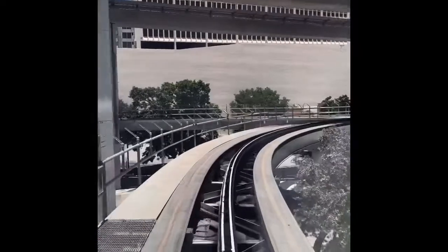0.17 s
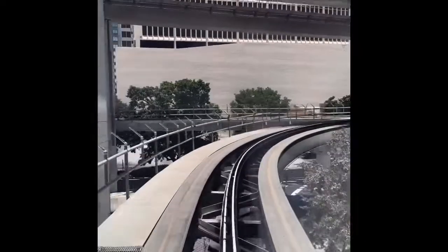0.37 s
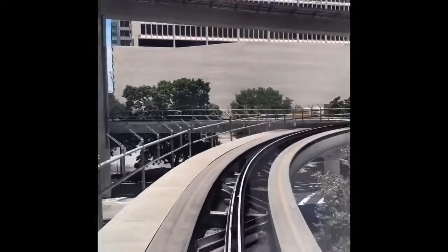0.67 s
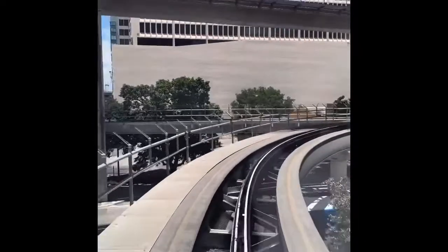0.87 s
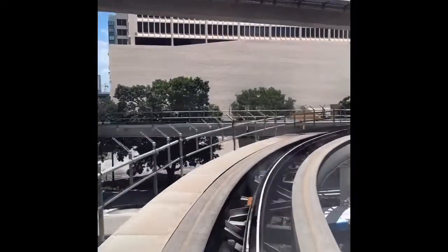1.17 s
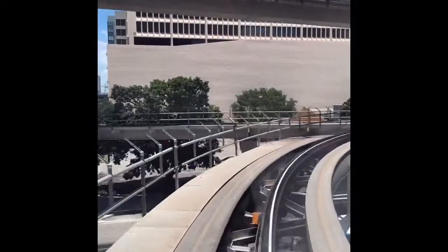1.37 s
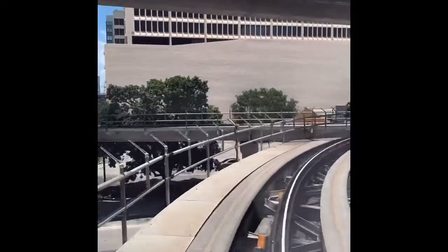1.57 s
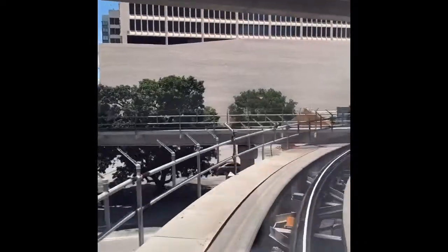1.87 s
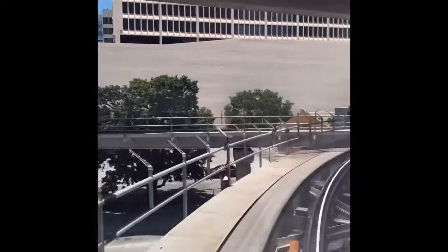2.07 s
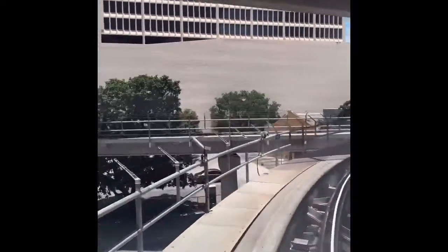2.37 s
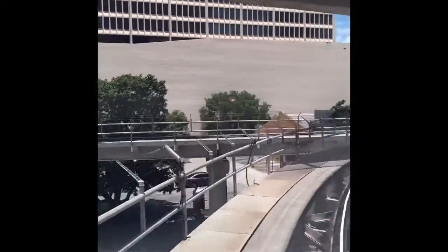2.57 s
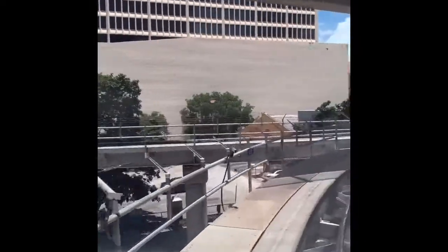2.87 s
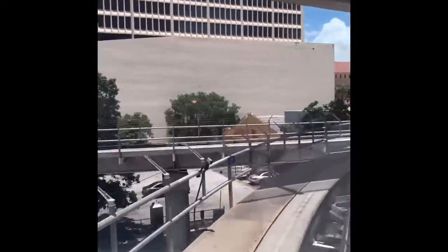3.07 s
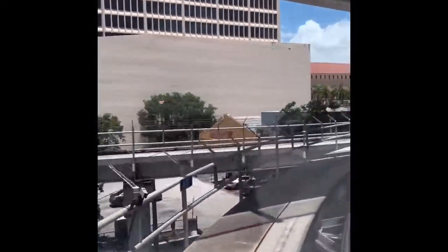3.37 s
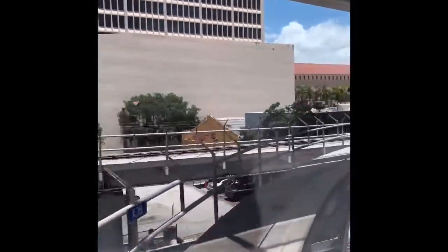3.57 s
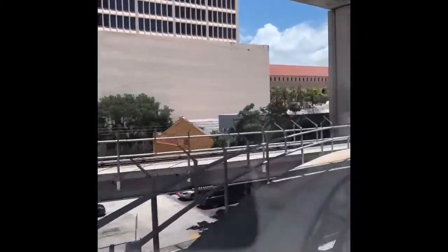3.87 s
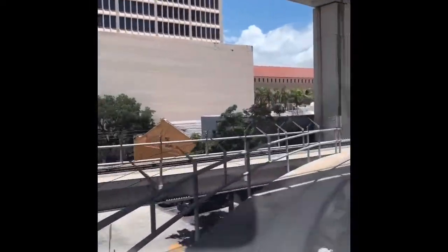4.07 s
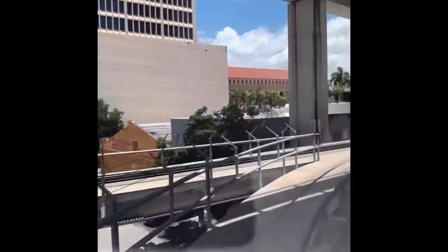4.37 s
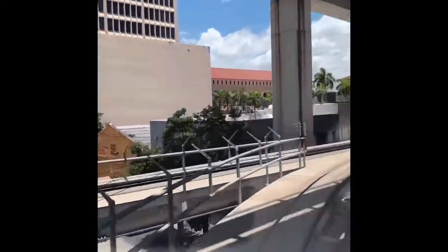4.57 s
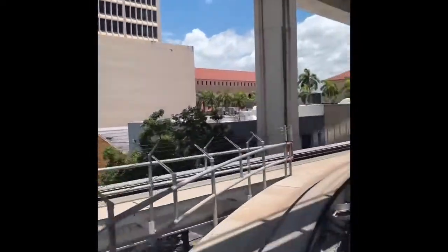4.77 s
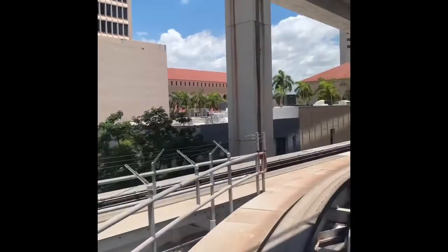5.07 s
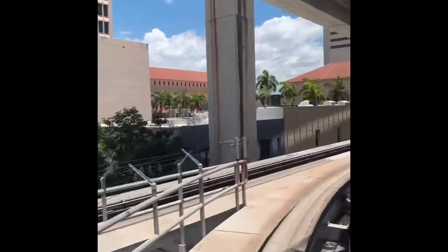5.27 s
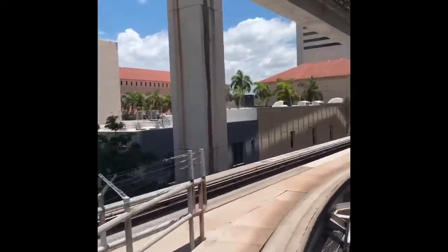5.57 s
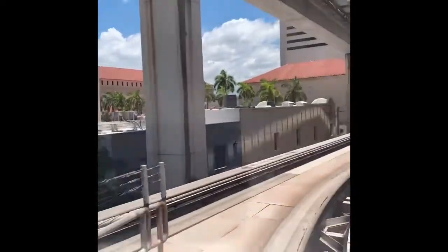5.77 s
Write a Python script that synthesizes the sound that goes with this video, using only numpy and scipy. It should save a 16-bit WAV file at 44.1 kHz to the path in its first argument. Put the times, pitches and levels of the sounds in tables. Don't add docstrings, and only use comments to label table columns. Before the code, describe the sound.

Inside an automated rubber-tyred train car, a steady deep rumble and low motor hum, with faint hissing scrapes and small panel ticks.

```python
import sys
import numpy as np
from scipy import signal
from scipy.fft import rfft, irfft, next_fast_len
from scipy.io import wavfile
from scipy.ndimage import uniform_filter1d

SR = 44100
rng = np.random.default_rng(int(sys.argv[2]) if len(sys.argv) > 2 else 0)


def level_to_linear(level):
    exponent = np.asarray(level, float) / 20
    return 10 ** exponent


def digitize_waveform(pressure):
    field = np.atleast_2d(pressure).T
    bounded = np.clip(field, -1, 1)
    quanta = np.round(bounded * 32767).astype(np.int16)
    wavfile.write(sys.argv[1], SR, quanta)


N = 261513


def evened(x):
    return x / np.sqrt(np.mean(abs(x) ** 2) + 1e-20)


def read(points, hz):
    f, value = np.transpose(points)
    return np.interp(np.log(hz + 1), np.log(f + 1), value)


def drift(top_hz):
    t = np.arange(0, N + 400, 200) / SR
    slow = 0
    for f in np.geomspace(.3, top_hz, num=16):
        slow = slow + np.sin(2 * np.pi * (f * t + rng.random())) / np.sqrt(f)
    return np.interp(np.arange(N) / SR, t, evened(slow))


# f/Hz, phase/rad
PORT_LEAD = [(100, 0), (300, -.1), (700, -.35), (1100, -.1), (2000, .9), (3300, 1.2), (4000, 2.1)]
# f/Hz, left minus right level/dB
PORT_TILT = [(60, 0.5), (110, 1.0), (200, 1.5), (380, 1.0), (700, -1.0), (1290, -1.0), (2380, -1.5),
             (4400, 0.5), (8120, 0.0), (15000, 0.0)]
HALF_TURN_HZ, FIRST_NULL_HZ = 2130, 4750


def ports(hz):
    delay = np.pi * (1 + (hz - FIRST_NULL_HZ) / HALF_TURN_HZ)
    low_lead = read(PORT_LEAD + [(FIRST_NULL_HZ, np.pi)], hz)
    lead = np.where(hz < FIRST_NULL_HZ, low_lead, delay)
    half = level_to_linear(read(PORT_TILT, hz) / 2) * np.exp(.5j * lead)
    return np.array([half, 1 / half])


# f/Hz, likeness/0-1
PORT_LIKENESS = [(60, .999), (120, .998), (200, .975), (330, .87), (500, .62), (650, .65), (900, .22),
                 (1200, .2), (1600, .52), (2400, .42), (2800, .4), (3400, .6), (3900, .88), (4700, .9),
                 (6000, .75), (8000, .68), (14000, .55)]


def noise(shape, patchy_db, flicker_db, size=2048):
    hop, hz = size // 4, np.fft.rfftfreq(size, 1 / SR)
    a, b, c, d, patches = rng.standard_normal((N // hop + 5, len(hz), 5)).T
    patches = uniform_filter1d(patches, size=10, axis=0)
    patches = evened(uniform_filter1d(patches, size=6, axis=1))
    flicker = rng.standard_normal(a.shape[1])
    same = np.clip(read(PORT_LIKENESS, hz), 0, 1)[:, None]
    left = a + 1j * b
    right = same * left + np.sqrt(1 - same ** 2) * (c + 1j * d)
    z = np.array([left, right]) * ports(hz)[:, :, None]
    z *= level_to_linear(read(shape, hz)[:, None] + patchy_db * patches + flicker_db * flicker)
    return evened(signal.istft(z, nperseg=size, noverlap=size - hop)[1][:, :N])


# t/s, load/0-1
MOTOR_LOAD = [
    (0, 0.37),
    (.6, 0.6),
    (1.2, 0),
    (2.2, 0.04),
    (2.9, 0.48),
    (3.3, 0.64),
    (4.2, 0.76),
    (5.5, 0.75),
    (5.93, 0.4),
]


def load():
    t, level = np.transpose(MOTOR_LOAD)
    return np.clip(np.interp(np.arange(N) / SR, t, level), 0, 1.5)


# f/Hz, density level/dB
BOOM_SPECTRUM = [(20, -32), (35, -22), (58, -10), (75, -7.5), (95, -1.5), (118, -3), (140, -9), (170, -21),
                 (260, -35), (420, -85)]
# f/Hz, density level/dB
ROAR_SPECTRUM = [(90, -37), (160, -1.5), (210, 0.5), (250, -3.5), (266, -8), (288, -4), (320, -13),
                 (410, -8), (480, -8), (590, -15), (630, -10), (700, -18.5), (850, -23.5), (1400, -43.5),
                 (2600, -87.5)]
# f/Hz, density level/dB
RUSH_SPECTRUM = [(400, -20.5), (800, 0), (1200, 0), (1800, -5), (2200, -12), (3500, -18.5), (5000, -29.5),
                 (6500, -26.5), (7400, -27.5), (8200, -38.5), (10000, -38.5), (13000, -48), (16000, -58.5)]
BOOM_DB, ROAR_DB, RUSH_DB = -15.5, -17, -36
BOOM_GAIN_DB, ROAR_GAIN_DB, RUSH_GAIN_DB = 0.5, -0.73, 0.9


def rolling():
    boom = noise(BOOM_SPECTRUM, patchy_db=1.0, flicker_db=0.03, size=4096)
    roar = noise(ROAR_SPECTRUM, patchy_db=1.5, flicker_db=.5, size=4096)
    rush = noise(RUSH_SPECTRUM, patchy_db=1.6, flicker_db=0.7, size=1024)
    boom *= level_to_linear(BOOM_DB + BOOM_GAIN_DB * load())
    roar *= level_to_linear(ROAR_DB + ROAR_GAIN_DB * load())
    rush *= level_to_linear(RUSH_DB + RUSH_GAIN_DB * load())
    return boom + roar + rush


# multiple of the hum pitch, level/dB
WEAK_ORDERS = [
    (.5, -15.5),
    (1.5, -6.5),
    (2.93, -13),
]
HUM_HZ, HUM_SAG_HZ_PER_S, HUM_WANDER_HZ = 119.55, .4, 1.232
HUM_DB, HUM_GAIN_DB, ORDERS_GAIN_DB = -26, 10, -2


def hum():
    pitch_hz = HUM_HZ - HUM_SAG_HZ_PER_S * np.arange(N) / SR + HUM_WANDER_HZ * drift(1.5)
    turns = np.cumsum(pitch_hz) / SR
    level_db = HUM_DB + HUM_GAIN_DB * load() + 2.2 * drift(11.0)
    out = level_to_linear(level_db) * np.sin(2 * np.pi * turns + 1.1 * drift(12.0))
    for k, db in WEAK_ORDERS:
        level_db = db - 18.5 + ORDERS_GAIN_DB * load() + 2.83 * drift(7.6)
        out += level_to_linear(level_db) * np.sin(2 * np.pi * k * turns + 0.76 * k * drift(12.0))
    return np.sqrt(2) * out * level_to_linear(np.array([[.5], [-.5]]))


# t/s, grind level/dB, fizz over grind level/dB, t60/s
JOINT_SCRAPES = [(.32, -48, -13.5, 1), (.89, -52, -13, .8), (1.03, -48.5, -13.5, 0.93),
                 (1.21, -53.5, -11, .8), (1.29, -46, -18, 1.5), (1.6, -56, -17, 1.3),
                 (2.024, -44.5, -17.5, 0.97), (2.17, -47, -19, 0.61), (2.44, -50, -16, .74),
                 (2.487, -34.5, -14.5, 0.46), (2.535, -41, -13.5, 1.03), (2.05, -46, -11.5, .8),
                 (3.11, -48, -27, .3), (.84, -50, -31, .8), (4.88, -41.5, -3, .3), (5.084, -42, -10, .2),
                 (5.11, -48, -12, .7), (2.66, -45, -17, 0.57), (2.83, -54, -12.5, 1.4),
                 (3.05, -49.5, -24.5, 1.8), (3.21, -49.5, -13.5, 0.87), (3.44, -53, -16, 1.6),
                 (3.74, -45, -13.5, 0.73), (4.2, -53, -18, 1.1), (4.605, -47, -12.5, 1.5),
                 (4.795, -40.5, -29, 0.53), (4.822, -41, -9.5, .88), (4.855, -36.5, -14, 1.13),
                 (5.03, -42.5, -24, 1.7), (5.14, -52, -12, 0.64), (5.34, -46, -18, 1.6),
                 (5.545, -43.5, -13, 0.59), (5.75, -48.5, -16, 0.49)]
# f/Hz, density level/dB
FIZZ_SPECTRUM = [(3500, -37), (5000, 2.5), (6500, -4.5), (8000, -4), (10000, -4), (12000, -9),
                 (14000, -6.5), (16000, -16)]
# f/Hz, density level/dB
GRIND_SPECTRUM = [(900, -24.5), (1500, -0.5), (2200, -2), (3000, -1), (3500, -2.5), (4000, -1),
                  (4700, -3.5), (6000, -10.5), (7500, -13.5), (9000, -41)]
SLIDE_FIZZ_DB, SLIDE_GRIND_DB = -74, -50.5
RISE_MS = 6.8


def shoes():
    power = np.ones((2, N)) * level_to_linear(2 * np.array([[SLIDE_FIZZ_DB], [SLIDE_GRIND_DB]]))
    for s, grind_db, bright_db, t60 in JOINT_SCRAPES:
        start = round(s * SR)
        t = np.arange(N - start)[:SR] / SR
        flare = (1 - np.exp(-t * 1000 / RISE_MS)) * level_to_linear(-60 * t / t60)
        peak = level_to_linear(np.array([[grind_db + bright_db], [grind_db]]))
        power[:, start:][:, :len(t)] += (peak * flare) ** 2
    fizz = level_to_linear(9.5) * noise(FIZZ_SPECTRUM, patchy_db=2.0, flicker_db=1.2, size=512)
    grind = level_to_linear(5.5) * noise(GRIND_SPECTRUM, patchy_db=2.0, flicker_db=0.7, size=512)
    return np.sqrt(power[0]) * fizz + np.sqrt(power[1]) * grind


# t/s, blow level/dB, brightness level/dB, ring level/dB
TRIM_TICKS = [(0.983, -31, -17, -20), (1.6766, -33, -9, -9), (2.025, -27, -6, -22), (2.186, -40, -10, -26),
              (2.2964, -38, 3, -24), (2.4542, -33, -15, -6), (2.4892, -36.5, -10, -38),
              (2.494, -29.5, -10, -28), (3.582, -25.5, -5.5, -9.5), (4.826, -27, -1, -26),
              (4.8575, -33, -3, -22), (5.0865, -33, 3, -28), (5.09, -34, 3, -28), (5.2693, -16, -26, -14),
              (5.3277, -9.5, -20, 5), (5.5568, -44, -6, -14.5), (5.7563, -36, -0.5, -30)]
# f/Hz, level/dB, t60/s
PANEL_MODES = [(1890, 1, .012), (2630, 2, .014), (2960, -4, .01), (3630, -1, .011), (4700, 4, .008),
               (5150, -6, .004), (6400, -14, .016), (7200, -12, .005), (8300, -7, .005)]
# f/Hz, level/dB, t60/s
BRIGHT_MODES = [(6000, -2, .003), (7500, -1, .003), (8900, -7, .003), (10200, -2, .004), (11500, -1, .003),
                (13600, -2, .003), (15000, -7, .003)]
# f/Hz, level/dB, t60/s
CLIP_MODES = [(3945, 0, .019)]
CHATTER_MS, CHATTER_DB_PER_DB = 1.6, -.8


def trim():
    t, out = np.arange(2500) / SR, np.zeros(N + 8000)
    for s, db, bright_db, ring_db in TRIM_TICKS:
        chatter_ms = CHATTER_MS * level_to_linear(CHATTER_DB_PER_DB * (db + 30))
        chatter = rng.standard_normal(len(t)) * np.exp(-t * 1000 / max(chatter_ms, .08))
        chatter[0] = 4.0
        modes = PANEL_MODES + [(hz, level + bright_db, t60) for hz, level, t60 in BRIGHT_MODES]
        modes += [(hz, level + ring_db, t60) for hz, level, t60 in CLIP_MODES]
        body = sum(level_to_linear(level - 60 * t / t60) * np.sin(2 * np.pi * hz * t) for hz, level, t60 in modes)
        tick = signal.fftconvolve(chatter, body * np.minimum(t / .0003, 1))
        out[round(s * SR):][:len(tick)] += level_to_linear(db + max(bright_db, 0) + 1.5) * tick / abs(tick).max()
    t = np.arange(6000) / SR
    tail = rng.standard_normal(len(t)) * level_to_linear(-60 * t / 0.078) * (t > .004)
    cabin = signal.fftconvolve(out, tail / np.linalg.norm(tail))[:N]
    out = out[:N] + level_to_linear(-13.5) * cabin
    size = next_fast_len(N)
    return irfft(rfft(out, size) * ports(np.fft.rfftfreq(size, 1 / SR)), size)[:, :N]


def scene():
    return rolling() + hum() + shoes() + trim()


# low f/Hz, high f/Hz
SUM_GAPS = [(4400, 5120), (8400, 9560), (12550, 13750)]
# low f/Hz, high f/Hz
DIFFERENCE_GAPS = [(6300, 7560), (10350, 11700), (14500, 16000)]
RAGGED, BAND_HZ, FICKLE_DB = .7, 170, 3.0


def joint_stereo(x, quiet_db, deaf_db_per_khz, sharp_db, coarse_db):
    hz, _, z = signal.stft(np.array([x[0] + x[1], x[0] - x[1]]) / 2, SR, nperseg=2048)
    frames = z.shape[2]
    for part, gaps in zip(z, (SUM_GAPS, DIFFERENCE_GAPS)):
        for low, high in gaps:
            steps = uniform_filter1d(rng.standard_normal((2, frames)), size=3)
            steps = np.round(RAGGED * evened(steps))
            edges = np.array([[low], [high]]) + BAND_HZ * steps * [[1], [.25]]
            part[(hz[:, None] > edges[0]) & (hz[:, None] < edges[1])] *= level_to_linear(-24.5)
        for low in range(9600, 16000, 230):
            band = (hz >= low) & (hz < low + 230)
            limit_db = quiet_db + deaf_db_per_khz * max(low - 12500, 0) / 1000
            limit_db += FICKLE_DB * evened(uniform_filter1d(rng.standard_normal(frames), size=2))
            part[band] *= (abs(part[band]) ** 2).mean(0) > level_to_linear(2 * limit_db)
    local = uniform_filter1d(abs(z) ** 2, size=24, axis=1)
    strong = abs(z) ** 2 > level_to_linear(2 * (coarse_db + 3 * (hz > 9000)))[:, None] * local
    z *= strong | (hz < 1000)[:, None]
    mid, side = signal.istft(z, SR, nperseg=2048)[1][:, :N]
    treble = signal.sosfilt(signal.butter(4, 3000, "high", fs=SR, output="sos"), x[0]) ** 2
    before = uniform_filter1d(treble, size=1500, origin=749)
    sharp = uniform_filter1d(treble, size=130) > level_to_linear(2 * sharp_db) * before
    sharp[:60] = True
    whole = uniform_filter1d(uniform_filter1d(sharp * 1., size=300), size=200)
    whole = np.minimum(whole * 20, 1)
    return whole * x + (1 - whole) * np.array([mid + side, mid - side])


def low_pass(x):
    return signal.sosfilt(signal.butter(12, 16590, fs=SR, output="sos"), x)


def record(dry):
    ceiling = 1.4
    edge = signal.firwin(511, 15720, window=("kaiser", 9), fs=SR)  # low-pass, Hz
    limited = signal.oaconvolve(ceiling * np.tanh(dry / ceiling), edge[None], "same")
    limited *= np.minimum(np.arange(N)[::-1] / 300, 1)
    mix = joint_stereo(limited, quiet_db=-100.0, deaf_db_per_khz=4.0, sharp_db=7.0, coarse_db=-4.5)
    return low_pass(mix)


dry = scene()
out = record(dry)
digitize_waveform(out)
```